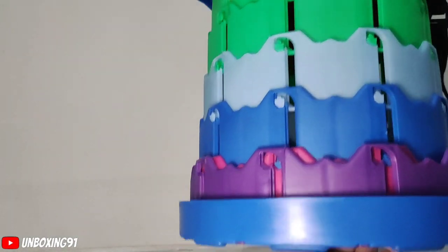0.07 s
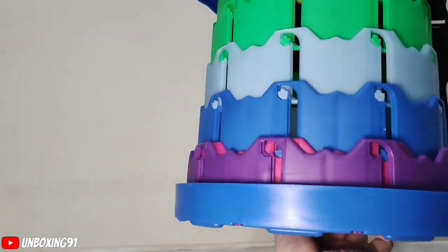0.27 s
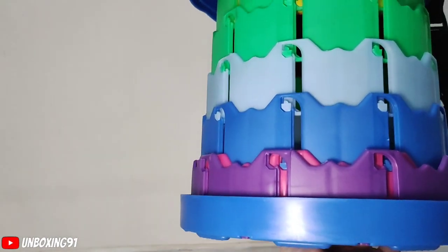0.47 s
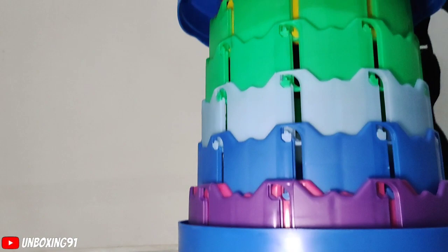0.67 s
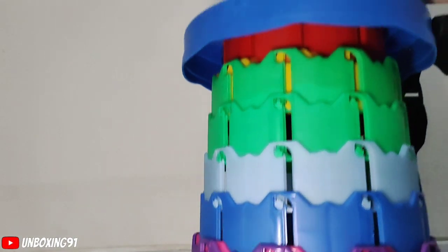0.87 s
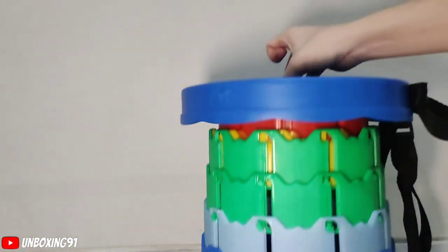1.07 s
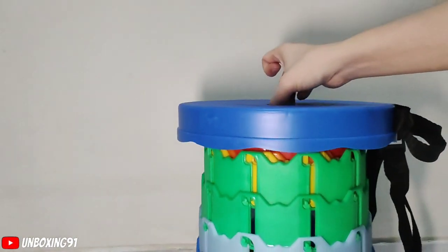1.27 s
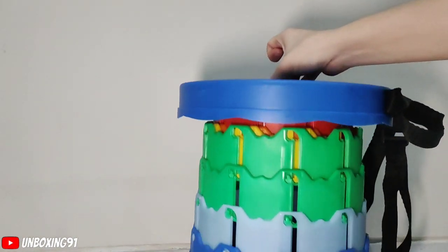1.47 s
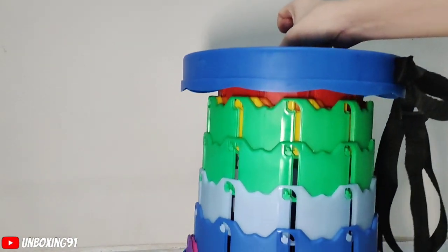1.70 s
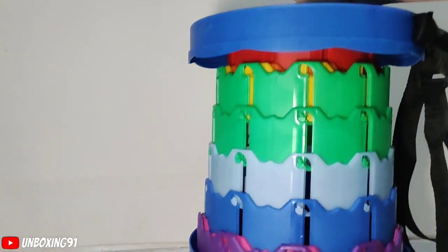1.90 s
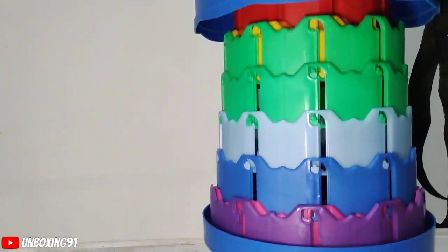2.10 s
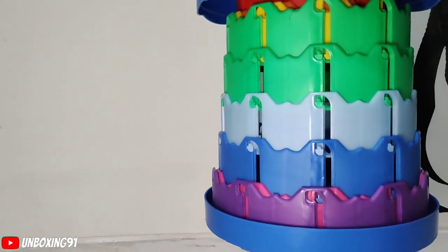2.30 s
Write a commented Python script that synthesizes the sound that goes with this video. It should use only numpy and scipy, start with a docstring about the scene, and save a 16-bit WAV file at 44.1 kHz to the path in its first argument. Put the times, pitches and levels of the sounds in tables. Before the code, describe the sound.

A plastic folding stool clacks open with one loud hollow knock, then clicks faintly.

```python
"""First comes a short sliding sound: the nested rings of a telescopic plastic stool are moving.
They hit their stops in one loud, hollow, clattering knock, which a bare room carries on for half
a second. Later the rings rub softly, the seat bumps and a few catches click into place.
Under it all lie faint room noise and a hum, joined by a low drone near the end."""
import sys
import numpy as np
from scipy import signal
from scipy.fft import rfft, irfft, next_fast_len
from scipy.io import wavfile
from scipy.ndimage import map_coordinates

SR = 44100
rng = np.random.default_rng(int(sys.argv[2]) if len(sys.argv) > 2 else 0)


def materialize(psi):
    """Save the field psi as 16-bit PCM at rate SR to the path in sys.argv[1].

    A 1-D psi becomes a single channel; in a 2-D psi each row is a channel.
    """
    bounded = np.clip(np.atleast_2d(psi).T, -1, 1)
    quanta = np.round(bounded * 32767).astype(np.int16)
    wavfile.write(sys.argv[1], SR, quanta)


N = 108045

# How alike left and right are (1 = the same), in the room and close to the stool: f/Hz, likeness
ROOM_LIKENESS = [(60, .93), (250, 0.87), (450, .7), (700, .35), (1300, -0.127), (2100, -0.17),
                 (3500, -0.13), (14000, -0.16)]
CLOSE_LIKENESS = [(300, 0.94), (1200, .8), (3000, 0.35), (14000, 0.013)]


def amp(db):
    """Turn decibels into a number to multiply by."""
    return 10 ** (np.asarray(db) / 20)


def unit(x):
    """Scale a signal to an average size (rms) of 1."""
    return x / np.sqrt(np.mean(x ** 2) + 1e-20)


def along(points, hz):
    """Read between (f/Hz, value) points on a pitch-like (log) scale."""
    freqs, values = np.transpose(points)
    return np.interp(np.log(hz + 1), np.log(freqs + 1), values)


def level(points):
    """Turn (t/s, level/dB) points into a gain for every sample."""
    return amp(np.interp(np.arange(N) / SR, *np.transpose(points)))


def wobble(per_s):
    """A smooth curve through per_s random values a second."""
    values = rng.standard_normal(int(N * per_s / SR) + 4)
    return map_coordinates(values, [np.arange(N) * per_s / SR])


def filtered(x, response):
    """Scale each frequency in x by response(hz)."""
    size = next_fast_len(N + SR // 2)
    return irfft(rfft(x, size) * response(np.fft.rfftfreq(size, 1 / SR)), size)[..., :N]


def spread(likeness, hz):
    """An angle that grows as left and right become less alike."""
    return np.arccos(np.clip(along(likeness, hz), -1, 1)) / 2


def noise(colour, likeness):
    """Stereo noise; its colour says how strong each frequency is."""
    def response(hz):
        angle = spread(likeness, hz)
        return amp(along(colour, hz)) * [np.cos(angle), np.sin(angle)]
    mid, side = filtered(rng.standard_normal((2, N)), response)
    return np.array([mid + side, mid - side])


def add(track, start_s, sound, pan_db):
    """Mix a sound into the track; pan_db is how much louder it is on the left."""
    part = track[:, max(round(start_s * SR), 0):][:, :sound.shape[1]]
    part += sound[:, :part.shape[1]] * amp([[pan_db / 2], [-pan_db / 2]])


def rubbing():
    """Ring sticks and slips on ring, which makes a grainy noise."""
    # The opening slide, the later rub and a brief dry scuff: t/s, level/dB
    slide = [(0, -65.5), (.028, -61), (.058, -47), (.11, -46), (.15, -42), (.19, -62), (.25, -100)]
    rub = [(.55, -100), (.65, -70), (.92, -73.5), (1.05, -67.5), (1.18, -64.5), (1.3, -68), (1.41, -67),
           (1.52, -73), (1.8, -81), (2.05, -72), (2.2, -72), (2.45, -117)]
    scuff = [(1.33, -100), (1.365, -69.5), (1.41, -69.5), (1.46, -80), (1.56, -100)]
    # The colour of each: f/Hz, level/dB
    slide_colour = [(40, -21.5), (100, -4.5), (180, -4), (330, -5), (600, 0.5), (860, 4), (1100, -4.5),
                    (2500, -3), (5000, -17), (8000, -18.5), (14000, -28.5)]
    rub_colour = [(150, -2), (450, 6.5), (850, -0.5), (1350, -9), (2000, -3.5), (3000, -5), (4800, -17),
                  (8000, -15.5), (10000, -20), (14000, -15.5)]
    scuff_colour = [(300, -18), (1200, -1), (3000, -4), (5500, -7), (7800, 0), (10000, -6), (14000, -6.5)]
    grains_per_s, grain_db = 220, 1.5
    out = np.zeros((2, N))
    for curve, colour in ((slide, slide_colour), (rub, rub_colour), (scuff, scuff_colour)):
        grainy = noise(colour, ROOM_LIKENESS) * amp(grain_db * wobble(grains_per_s))
        out += level(curve) * unit(grainy)
    return out


def room_noise():
    """The faint, low rush of a quiet room."""
    # Its colour: f/Hz, level/dB
    colour = [(25, -8.5), (60, -2.5), (96, -6), (173, -2), (286, -10.5), (344, -16.5), (390, -8.5),
              (470, -18), (720, -26), (1300, -28), (4000, -36.5), (14000, -39.5)]
    # Its slow fall and rise: t/s, level/dB
    loudness = [(0, -58.5), (.7, -62.5), (1.25, -67.5), (1.75, -65), (2.45, -65.5)]
    return level(loudness) * unit(noise(colour, ROOM_LIKENESS))


def tone(hz, waver_db, drift_rad):
    """A pure note whose loudness and pitch can wander a little."""
    waver = amp(waver_db * wobble(9))
    phase = 2 * np.pi * hz * np.arange(N) / SR + drift_rad * wobble(6)
    return unit(waver * np.sin(phase))


def hum():
    """Three faint, wavering notes that fade and return together."""
    # The notes: f/Hz, level/dB
    notes = [(161.5, -74.5), (188.4, -69.5), (428, -74)]
    # Their shared rise and fall: t/s, gain/dB
    swell = [(0, 5.5), (1.22, 0), (1.5, -7.5), (1.8, -16), (2.2, 0.5), (2.45, -19)]
    return level(swell) * sum(amp(db) * tone(hz, waver_db=2.5, drift_rad=.8) for hz, db in notes)


def clack(hz, db):
    """A struck spot's own note: it swells in about one cycle and soon dies."""
    life_cycles = 12.66
    cycles = hz * np.arange(SR // 4) / SR
    swell = 1 - np.exp(-cycles ** 2)
    return amp(db - 60 * cycles / life_cycles) * swell * np.sin(2 * np.pi * cycles)


def ringing(notes, samples):
    """Notes of the struck stool; each fades by 60 dB in its own time, called t60."""
    contact_s, bass_cut_hz = 0.0012, 340  # the small shell gives off little bass
    t = np.arange(samples) / SR
    out = np.zeros((2, samples))
    for hz, db, t60 in notes:
        skew = rng.choice([-1, 1]) * spread(CLOSE_LIKENESS, hz)  # high notes reach the ears out of step
        out += amp(db - 60 * t / t60) * np.sin(2 * np.pi * hz * t + np.array([[skew], [-skew]]))
    bass_cut = signal.butter(4, bass_cut_hz, "high", fs=SR, output="sos")
    return signal.sosfilt(bass_cut, out * (1 - np.exp(-t / contact_s)))


def burst(colour, t60_s):
    """A puff of noise that dies away."""
    fade = amp(-60 * np.arange(SR // 4) / SR / t60_s)
    return unit(noise(colour, CLOSE_LIKENESS))[:, :SR // 4] * fade


def knock():
    """The rings hit their stops in quick turn; each hit clacks, cracks and sets the shell ringing."""
    # The hits: t/s, clack/dB, clack f/Hz, shell/dB, crack/dB, pan/dB
    hits = [(0.1226, -26, 660, -41.5, -45.5, -7.5), (.127, -32, 2420, -44, -45, -3.5),
            (.1428, -20.5, 2100, -35.5, -34.5, -3), (.1445, -21.5, 562, -35, -38.5, -5),
            (0.1507, -2.5, 1270, -25, -32, 4), (0.1519, -14.5, 481.4, -26, -31, 1.5),
            (0.1517, -9, 2100, -30, -35.5, 1), (0.1554, -17, 2550, -42.5, -36, -1),
            (.164, -8, 655, -27.5, -24.5, -1), (0.167, -13, 899, -28, -24, 8.5),
            (.184, -13.5, 761, -37.5, -44, 0)]
    # The notes of the plastic shell: f/Hz, level/dB, t60/s
    shell_notes = [(435.7, -7.5, 0.081), (484.3, -3, 0.064), (776.7, -8.5, 0.091), (868, -6.5, 0.046),
                   (1046, -5, 0.059), (1143, -1.5, .04), (1470, -6, 0.023), (1786, 4, .025),
                   (2430, -8, .025), (2830, -11, 0.023), (4440, -16, 0.029)]
    # The colour of the crack: f/Hz, level/dB
    crack_colour = [(30, -32.5), (75, -14.5), (125, 7.5), (230, 7.5), (340, 0), (450, 7.5), (1500, 5.5),
                    (2700, 2.5), (3500, -3), (4400, 2), (5500, -8), (7900, -5), (10500, -12.5),
                    (14000, -18.5)]
    out = np.zeros((2, N))
    for start_s, clack_db, hz, shell_db, crack_db, pan_db in hits:
        shell = amp(shell_db) * ringing(shell_notes, SR // 4)
        crack = amp(crack_db) * burst(crack_colour, t60_s=0.034)
        add(out, start_s, clack(hz, clack_db) + shell + crack, pan_db)
    return out


def cavity_notes():
    """The hollow inside the stool answers the knock at once with two short, deep notes."""
    # The notes: t/s, f/Hz, level/dB, t60/s
    notes = [(.1475, 449.7, -15, .09), (.1645, 803.6, -18, .09)]
    out = np.zeros((2, N))
    for start_s, hz, db, t60 in notes:
        add(out, start_s, ringing([(hz, db, t60)], SR // 2), pan_db=0)
    return out


def hollow_air():
    """The air inside the stool rings on after the knock; higher notes die sooner."""
    # The notes of the air, lowest first: f/Hz, level/dB
    notes = [(413, -34), (436, -35), (630, -42.5), (672, -39.5), (776, -39), (836, -39), (1152, -39)]
    start_s, lowest_t60_s, lowest_hz = 0.17, 0.79, notes[0][0]
    fading_notes = [(hz, db, lowest_t60_s * np.sqrt(lowest_hz / hz)) for hz, db in notes]
    out = np.zeros((2, N))
    add(out, start_s, ringing(fading_notes, SR * 3 // 2), pan_db=0)
    return out


def seat_bumps():
    """The seat bumps softly: each time a dull thud and a tap of noise."""
    # The bumps: t/s, thud/dB, thud f/Hz, tap/dB, pan/dB
    bumps = [(.548, -39, 345.2, -91, -4), (1.109, -43.5, 459.5, -77, -4), (1.344, -49, 328.6, -57.5, -3),
             (1.3594, -44, 283.7, -44, 0.5), (1.938, -46.5, 161, -74, 1.5)]
    # The colour of the tap: f/Hz, level/dB
    tap_colour = [(60, -6.5), (170, -2), (300, 2), (450, 6.5), (750, -7.5), (1100, -5.5), (2200, -13),
                  (4000, -25.5), (8000, -36), (14000, -41)]
    out = np.zeros((2, N))
    for start_s, thud_db, hz, tap_db, pan_db in bumps:
        tap = amp(tap_db) * burst(tap_colour, t60_s=0.071)
        add(out, start_s, clack(hz, thud_db) + tap, pan_db)
    return out


def catches():
    """Small plastic catches snap into place and ring, each with a note of its own."""
    # The clicks: t/s, ringing/dB, own note/dB, own note f/Hz, snap/dB, pan/dB
    clicks = [(1.845, -63, -47.5, 2020, -64.5, -17.5), (1.8478, -46.5, -38, 2450, -50.5, 5),
              (1.8529, -49.5, -45, 2330, -70, -7), (1.948, -51, -43.5, 2000, -61.5, 6),
              (1.9535, -54, -49.5, 3000, -72.5, -13), (1.962, -51, -47, 1920, -72, 10),
              (2.085, -69.5, -61, 2300, -87.5, 3), (2.126, -70, -54, 1900, -86, 3.5),
              (2.156, -59, -55, 850, -54, 7.5)]
    # The notes all catches share: f/Hz, level/dB, t60/s
    catch_notes = [(533.7, -11.5, 0.029), (1890, -6, 0.042), (2277, 3, 0.024), (2776, -1, 0.014),
                   (3070, -2.5, 0.026), (4840, -18.5, 0.026)]
    # The colour of the snap: f/Hz, level/dB
    snap_colour = [(150, -23), (380, 8.5), (520, 10.5), (850, 5.5), (1400, -3.5), (2300, 0.5), (3400, 3),
                   (4500, -7), (8000, -9), (14000, -20)]
    out = np.zeros((2, N))
    for start_s, ring_db, note_db, hz, snap_db, pan_db in clicks:
        ring = amp(ring_db) * ringing(catch_notes, SR // 4)
        snap = amp(snap_db) * burst(snap_colour, t60_s=0.053)
        add(out, start_s, ring + clack(hz, note_db) + snap, pan_db)
    return out


def drone():
    """A very low note that swells near the end."""
    # Its rise and fall: t/s, level/dB
    swell = [(1.8, -94), (1.95, -66), (2.03, -75), (2.12, -64.5), (2.27, -59.5), (2.34, -74), (2.45, -72)]
    return level(swell) * tone(hz=57.5, waver_db=0, drift_rad=.4)


def in_room(x, echo_db):
    """A sound plus its echo from bare walls; the treble dies first."""
    # The colour of the echo: f/Hz, level/dB
    colour = [(100, -3), (230, 0), (300, -1), (365, -11.5), (415, -1), (520, -1.5), (800, -2), (1300, -0.5),
              (2500, 2), (5000, 0), (9000, -2.5), (14000, -0.5)]
    # How long the echo lasts: f/Hz, t60/s
    fade_times = [(100, 1), (400, 0.83), (1000, 0.73), (2500, 0.72), (5000, 0.57), (9000, 0.51),
                  (14000, 0.54)]
    wall_delay_s, build_up_s = 0.0045, 0.0037
    hz, t, bands = signal.stft(noise(colour, ROOM_LIKENESS)[:, :SR * 3 // 2], SR, nperseg=256)
    fade = amp(-60 * t / along(fade_times, hz)[:, None])
    tail = signal.istft(bands * fade, SR, nperseg=256)[1]
    t = np.arange(tail.shape[1]) / SR
    tail *= 1 - np.exp(-np.maximum(t - wall_delay_s, 0) / build_up_s)
    tail *= np.sqrt(2) / np.linalg.norm(tail)
    return x + amp(echo_db) * signal.fftconvolve(x, tail, axes=1)[:, :N]


def scene():
    """The stool stands a little to the right, in a quiet room."""
    # How much louder the stool is on the left: f/Hz, pan/dB
    balance = [(100, -2), (400, -2), (680, -2.5), (1250, -3), (2300, -1.5), (4300, -8), (7800, -9.5),
               (14000, 1)]
    stool = in_room(knock(), echo_db=-1.5) + cavity_notes() + hollow_air()
    stool += in_room(catches(), echo_db=-12.5)
    stool += in_room(rubbing() + seat_bumps(), echo_db=-7.5)
    stool = filtered(stool, lambda hz: amp(along(balance, hz) * np.array([[.5], [-.5]])))
    return stool + hum() + drone() + room_noise()


def record(dry):
    """Cut away the very highest treble."""
    top_hz, edge_hz = 14300, 300
    return filtered(dry, lambda hz: np.clip((top_hz - hz) / edge_hz + .5, 0, 1))


dry = scene()
out = record(dry)
materialize(out)
```